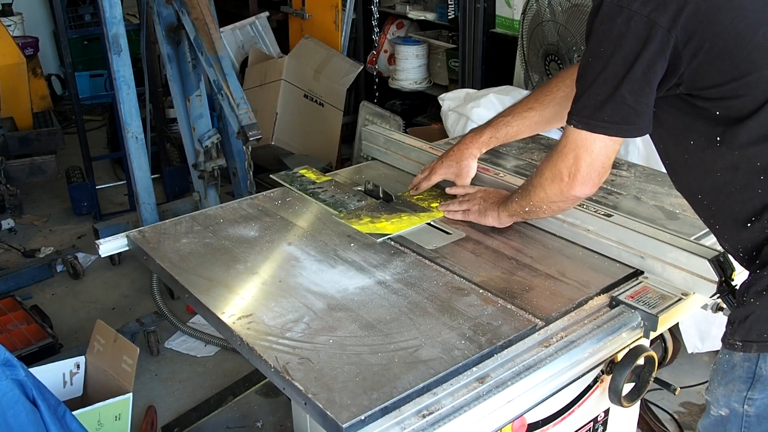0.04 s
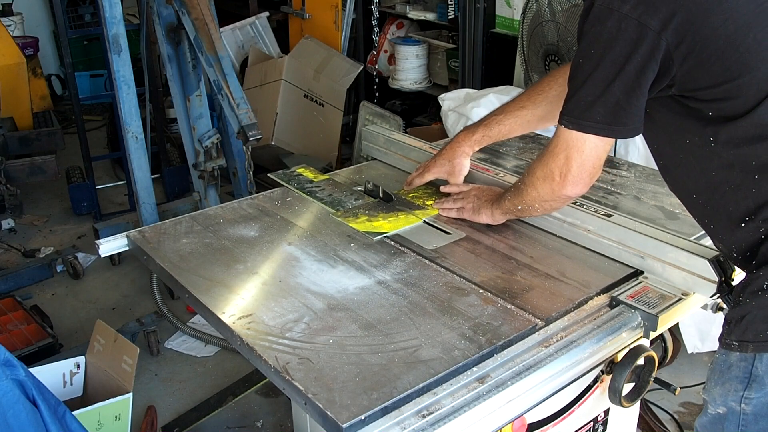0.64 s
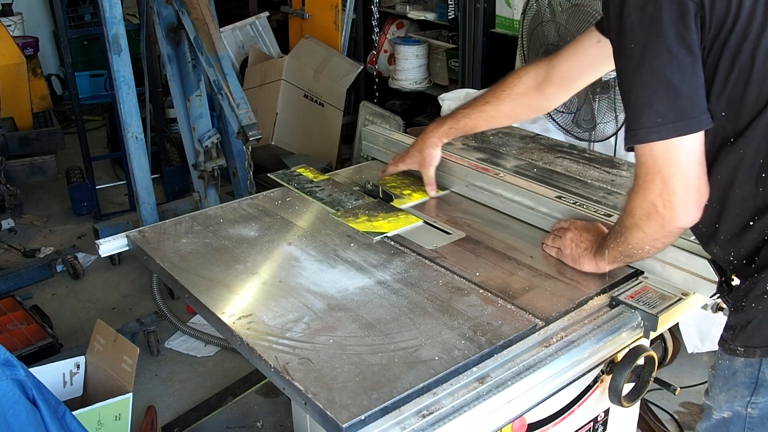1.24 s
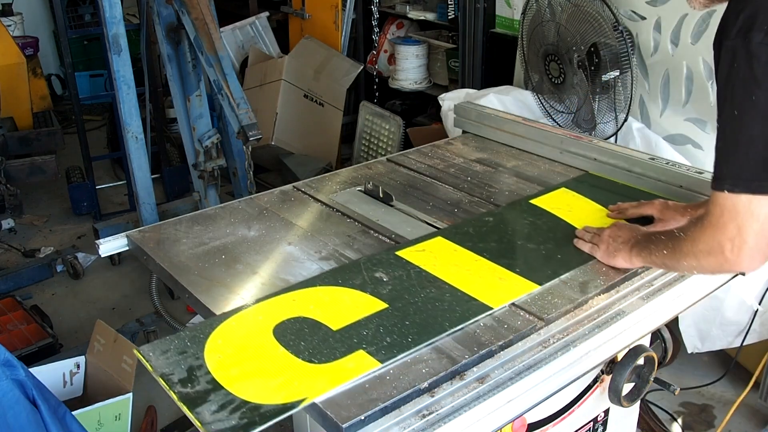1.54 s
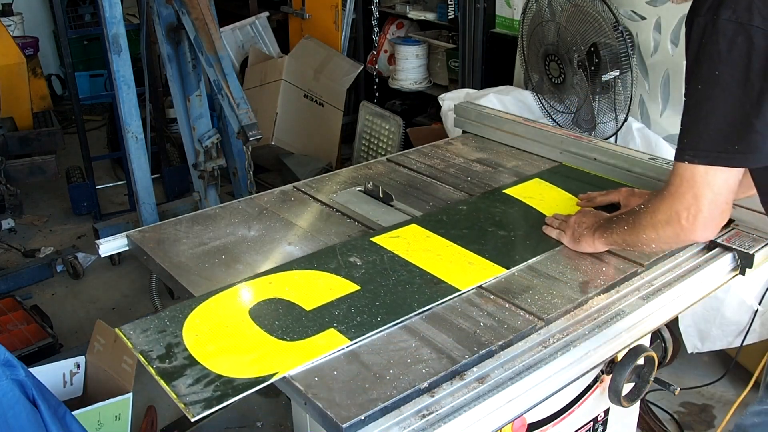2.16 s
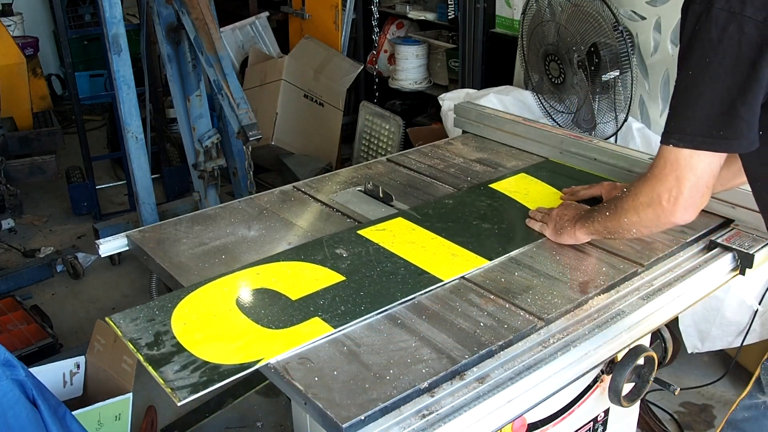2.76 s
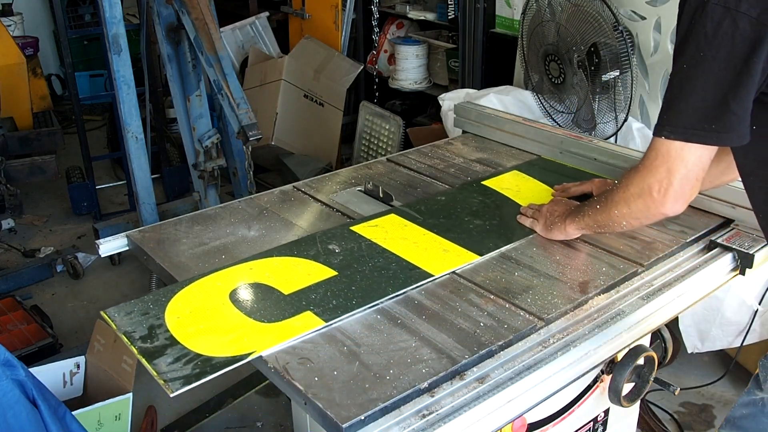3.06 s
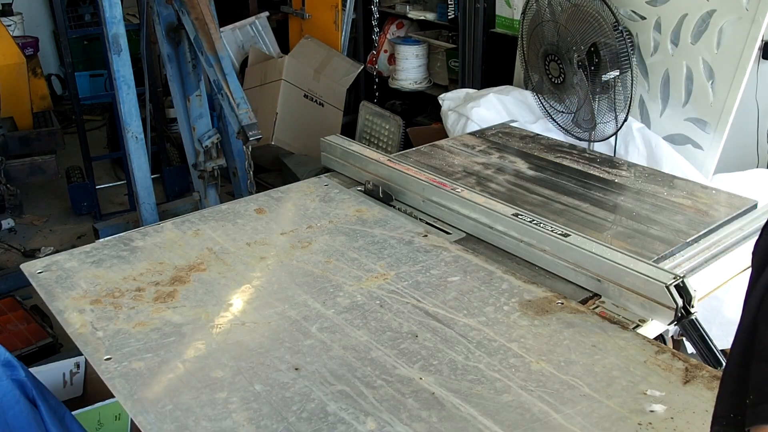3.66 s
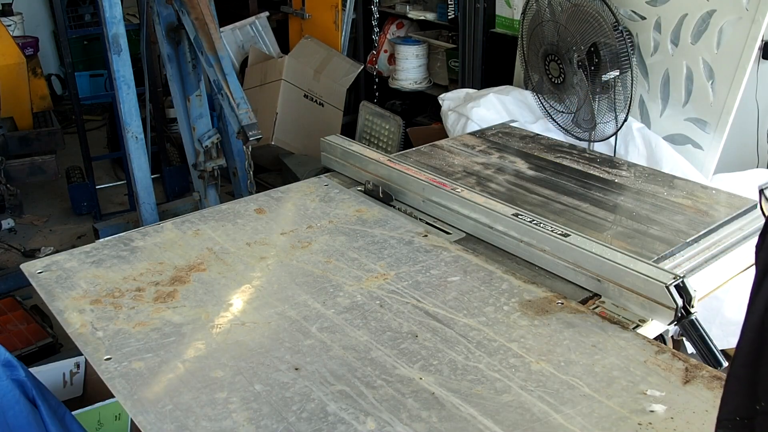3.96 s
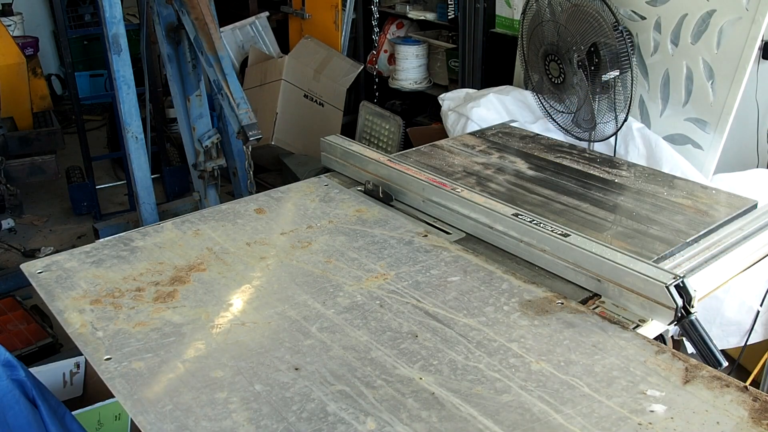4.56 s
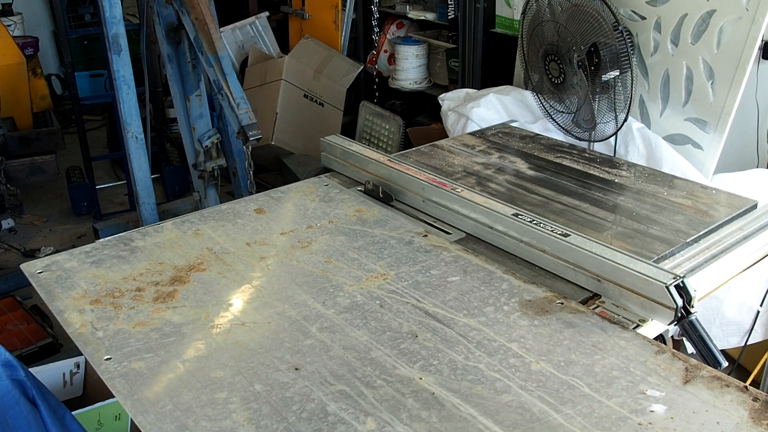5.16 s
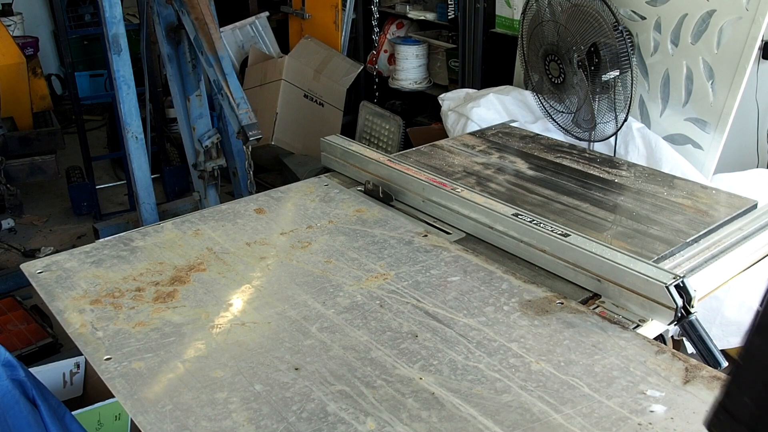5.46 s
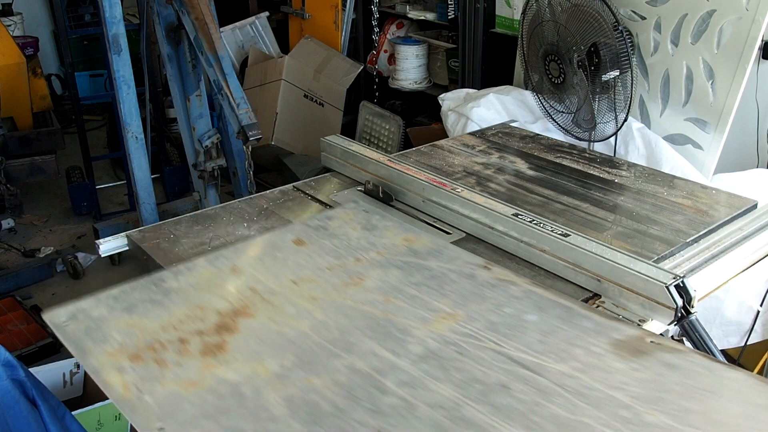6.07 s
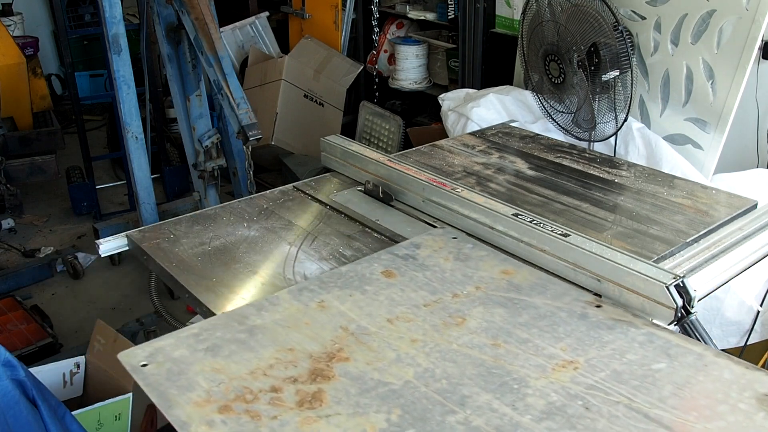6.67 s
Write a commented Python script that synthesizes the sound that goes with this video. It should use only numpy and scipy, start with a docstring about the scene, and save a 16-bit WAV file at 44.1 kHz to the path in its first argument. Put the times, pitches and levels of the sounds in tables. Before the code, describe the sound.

A table saw scrapes and squeals through metal sheet twice, cuts to quiet, then is switched on and spins up to a whistling drone.

```python
"""A table saw scrapes and squeals through a small metal sheet. Three more short scenes follow: it runs
free, it rips a long sheet, then it stands still, is switched on and spins up.
In the cuts the teeth tear chips, and blade and sheet ring; the blade sticks and slips in the kerf.
The motor hums, its fan drones, the teeth whistle and stir the air.
At the start the winding growls and belt and cabinet rattle."""
import sys
import numpy as np
from scipy import signal
from scipy.fft import rfft, irfft, next_fast_len
from scipy.io import wavfile
from scipy.ndimage import map_coordinates

SR = 44100
rng = np.random.default_rng(int(sys.argv[2]) if len(sys.argv) > 2 else 0)


def unload_audio(sound):
    """Save the sound as a 16-bit wav file, at the path given as the first command line argument."""
    columns = np.transpose(np.atleast_2d(sound))
    # keep every value between -1 and 1, then stretch to whole-number steps
    steps = np.round(np.clip(columns, -1, 1) * 32767)
    wavfile.write(sys.argv[1], SR, steps.astype(np.int16))


N = 300321
SIZE = next_fast_len(N, real=True)
TIME, BINS = np.arange(N) / SR, np.fft.rfftfreq(SIZE, 1 / SR)

MAINS_HZ = 50
# running scenes end; power on; blade starts to turn; starting winding cuts out
STOP_S, SWITCH_ON_S, TURN_S, CUTOUT_S = 3.37, 4.212, 4.428, 5.24

# One table a cut, small sheet then long. Each row: time in s, blade ring in dB, chip spray in dB.
CUT_ENVELOPES = [
    [(0.0, -27.5, -27), (.4, -27.5, -30.5), (.51, -27, -27.5), (.58, -31, -33), (.79, -30.5, -37.5),
     (.89, -30, -34.5), (1.32, -25.5, -32.5), (1.36, -32.5, -35), (1.42, -36, -46)],
    [(1.975, -31, -31.5), (2.14, -30.5, -34.5), (2.45, -26.5, -26.5), (2.78, -28.5, -29.5),
     (3.0, -26.5, -25.5), (3.1, -24.5, -29.5), (3.2, -29.5, -30), (3.27, -25.5, -30), (3.378, -31, -34.5)],
]
# Likeness of left and right. Each row: frequency in Hz, correlation.
STEREO_CORRELATION = [(100, 1), (400, 0.99), (1000, 0.83), (2000, 0.64), (3000, 0.36), (5500, 0.22),
                      (9000, 0.04), (15000, 0.046)]


def amp(db):
    """dB to gain."""
    return 10 ** (np.asarray(db) / 20)


def unit(x):
    """Scale to rms 1."""
    return x / np.sqrt(np.mean(x ** 2) + 1e-20)


def curves(rows):
    """Table columns as curves over time."""
    times_s, *columns = np.transpose(rows)
    return [np.interp(TIME, times_s, column) for column in columns]


def level(rows):
    """Rows of (s, dB) as a gain curve."""
    return amp(curves(rows)[0])


def gate(start_s, rise_s, end_s=np.inf, fall_s=1):
    """Linear rise from start_s, hold, linear fall from end_s."""
    return np.clip((TIME - start_s) / rise_s, 0, 1) * np.clip(1 - (TIME - end_s) / fall_s, 0, 1)


def since(start_s):
    """Seconds since start_s, zero before."""
    return np.maximum(TIME - start_s, 0)


def wander(rate_hz):
    """Smooth random curve, rms 1."""
    knots = rng.standard_normal(size=4096)
    coarse_s = TIME[::32]
    smooth = map_coordinates(knots, [coarse_s * rate_hz * 2], order=2, mode="wrap")
    return np.interp(TIME, coarse_s, unit(smooth))


def spectrum(points):
    """Rows of (Hz, value) joined over log frequency."""
    hz, value = np.transpose(points)
    return np.interp(np.log(BINS + 1), np.log(hz + 1), value)


def shaped(x, response):
    """Filter by a frequency response."""
    return irfft(rfft(x, SIZE) * response, SIZE)[:, :N]


def mode(hz, width_hz):
    """Frequency response of one resonance."""
    return 1 / (1 + 2j * (BINS - hz) / width_hz)


def reflections(wet_db, t60_s):
    """Direct path plus echoes off table and walls, which ripple the upper spectrum."""
    echoes = rng.standard_normal(N) * np.exp(-np.log(1000) * np.minimum(TIME / t60_s, 10))
    echoes *= TIME > .004
    return 1 + amp(wet_db) * rfft(echoes / np.linalg.norm(echoes), SIZE) * BINS / (BINS + 400)


def noise(response):
    """Coloured stereo noise, rms 1, less correlated toward the treble."""
    a, b = rng.standard_normal((2, len(BINS))) + 1j * rng.standard_normal((2, len(BINS)))
    correlation = np.clip(spectrum(STEREO_CORRELATION), -1, 1)
    mid, side = a * np.sqrt(1 + correlation), b * np.sqrt(1 - correlation)
    return unit(irfft(np.array([mid + side, mid - side]) * response, SIZE)[:, :N])


def band(length_s, hz, width_hz):
    """Short stereo noise in a Gaussian band, rms 1."""
    size = round(length_s * SR)
    a, b = rng.standard_normal((2, 2 * SR))[:, :size]
    correlation = np.clip(np.interp(hz, BINS, spectrum(STEREO_CORRELATION)), -1, 1)
    mid, side = a * np.sqrt(1 + correlation), b * np.sqrt(1 - correlation)
    colour = np.exp(-.5 * ((np.fft.rfftfreq(size, 1 / SR) - hz) / width_hz) ** 2)
    return unit(irfft(rfft([mid + side, mid - side]) * colour, size))


def phase(hz):
    """Running angle in rad of a frequency curve."""
    return 2 * np.pi * np.cumsum(hz * np.ones(N)) / SR


def tone(angle, flutter, rate_hz, spread_rad):
    """Sine of rms 1; it flutters in moving air and reaches the two microphones out of step."""
    size = 1 + flutter * wander(rate_hz)
    start_rad = 2 * np.pi * rng.random()
    offsets_rad = np.array([spread_rad * (side + flutter * wander(rate_hz)) for side in (.5, -.5)])
    return unit(size * np.cos(start_rad + angle + offsets_rad))


def add(mix, start_s, sound):
    """Mix a sound in at start_s."""
    part = mix[:, round(start_s * SR):][:, :sound.shape[1]]
    part += sound[:, :part.shape[1]]


def cut(sheet):
    """Teeth tear chips in uneven bites; the scrape rings the blade and drums on sheet 0 or 1."""
    # Each row: frequency in Hz, scrape density in dB.
    scrape_colour = [(100, -35), (300, -21.5), (700, -14.5), (1100, -5), (2000, -9), (2500, -0.5),
                     (3400, 5), (4400, 3), (5500, -2), (6900, 1), (9000, -1.5), (12000, -4.5), (15500, -11)]
    # Each row: frequency in Hz, width in Hz, dB over the scrape on the small sheet, on the long sheet.
    blade_modes = [(1141, 20, 9, 5), (1529, 16, -6, 9), (1831, 14, 6, 0), (1990, 16, 3, 0),
                   (2449, 18, 3, -4), (2606, 16, 4, -4), (2643, 22, 6, 2), (2993, 20, 0, -10),
                   (3110, 22, 0, -5), (3335, 26, 6, 4), (3566, 26, 2, 6), (4152, 20, 10, 6),
                   (4229, 11, 7, 14), (4514, 22, 5, -5), (4750, 18, 2, 3), (4942, 16, 4, -6),
                   (5145, 26, 6, 4), (5770, 40, -2, -6), (5943, 40, -8, 1), (6185, 20, 1, 3),
                   (7010, 60, -1, -2), (8040, 60, -2, -1), (8330, 24, -2, 3), (8920, 30, 2, -6),
                   (9286, 24, -3, 1), (9580, 36, 3, -3), (9959, 24, -2, 2), (10660, 36, -1, -1),
                   (10960, 36, -4, 0), (11876, 60, -12, 0)]
    # Each row, one a sheet: offsets in dB for drumming, ring and spray.
    offsets_db = [(-8.5, -1, 1.2), (-10.5, -0.15, 1.5)]
    chips_per_s, chip_decay_s, crossovers_hz = 260, 0.00066, (2100, 5300)
    envelope = CUT_ENVELOPES[sheet]
    start_s, end_s = envelope[0][0], envelope[-1][0]
    contact = np.interp(TIME, [start_s - .004, start_s, end_s - .01, end_s + 0.0081], [0, 1, 1, 0])
    impulses = (rng.random(N) < chips_per_s / SR) * np.minimum(rng.exponential(1, N), 4)
    chips = signal.lfilter([1], [1, -np.exp(-1 / (chip_decay_s * SR))], impulses)
    bites = amp(0.52 * wander(40)) * (1 + 0.29 * chips)
    scrape = noise(1) * bites
    ring = 1 + sum(amp(db[sheet]) * mode(hz, width_hz) for hz, width_hz, *db in blade_modes)
    body = amp(spectrum(scrape_colour)) * ring * reflections(wet_db=-2.5, t60_s=0.11)
    above_sheet, above_blade = (1 / (1 + (hz / (BINS + 1)) ** 12) for hz in crossovers_hz)
    ring_db, spray_db = curves(envelope)
    # drumming low, ring in the middle, spray on top
    bands = [(1 - above_sheet, ring_db), (above_sheet - above_blade, ring_db), (above_blade, spray_db)]
    return contact * sum(amp(db + offset_db) * unit(shaped(scrape, body * share))
                         for (share, db), offset_db in zip(bands, offsets_db[sheet]))


def squeal():
    """One blade mode sticks and slips in the kerf: a rough, stuttering stack of partials."""
    # Each row: start in s, end in s, pitch in Hz, pitch sag in Hz, level in dB, fade in dB.
    spells = [(0, 0.507, 2398, 2, -39, -2), (.56, 1.36, 2380, -1, -46, -5),
              (1.977, 2.011, 2405, 20, -24.5, 5), (2.013, 2.403, 2405, 50, -35, 9),
              (2.408, 2.916, 2364, 0, -41.5, 0.5), (3.046, 3.171, 2403, 21, -39, 2),
              (3.299, 3.364, 2375, 1.5, -39, -2)]
    # Each row: harmonic number, dB on the small sheet, dB on the long sheet.
    partials = [(1, 2, 1.5), (2, -22, 0), (3, -12, -2.5), (4, -10, -4.5), (5, -7, -7), (6, -17, -8)]
    rise_s, fall_s = 0.0041, .015
    hz, envelope = np.zeros(N), np.zeros(N)
    for start_s, end_s, pitch_hz, sag_hz, db, fade_db in spells:
        progress = np.clip((TIME - start_s) / max(end_s - start_s, .01), 0, 1)
        hz = np.where(TIME >= start_s, pitch_hz - sag_hz * progress, hz)
        spell = amp(db - fade_db * progress) * gate(start_s, rise_s, end_s, fall_s)
        envelope = np.maximum(envelope, spell)
    long_sheet = TIME > CUT_ENVELOPES[0][-1][0] + .2
    slip_hz = np.where(long_sheet, 23, 6) * wander(130)
    angle = phase(hz + slip_hz)
    stack = sum(amp(np.where(long_sheet, long_db, small_db))
                * tone(round(k) * angle, flutter=0.33, rate_hz=45, spread_rad=0.63)
                for k, small_db, long_db in partials)
    stutter_db = np.where(long_sheet, 2.8, 1.4) * wander(45)
    return envelope * amp(stutter_db) * stack


def singing():
    """Single resonances of sheet, blade or cabinet swell and fade; friction holds them fairly steady."""
    # Each row: start in s, end in s, frequency in Hz, width in Hz, level in dB.
    spells = [(.42, .66, 1831, 14, -39.5), (.8, 1.12, 1831, 14, -40), (0, 1.35, 4155, 14, -42),
              (2.0, 2.44, 4768, 10, -33), (2.22, 2.46, 9290, 22, -43), (2.24, 2.46, 8330, 18, -44),
              (2.25, 3.2, 3568, 12, -35.5), (2.1, 2.9, 2635, 25, -41), (2.92, 3.1, 4746, 10, -30.5),
              (3.13, 3.38, 7060, 30, -39), (3.04, 3.17, 1400, 40, -38.5), (2.89, 3, 1529, 20, -43),
              (3.21, 3.33, 1835, 25, -42.5), (3.94, 4.15, 4220, 170, -64), (4.47, 4.53, 4480, 130, -47),
              (4.48, 4.56, 2620, 100, -44), (4.77, 4.96, 1700, 60, -40), (4.93, 5.3, 660, 90, -38)]
    out = np.zeros((2, N))
    for start_s, end_s, hz, width_hz, db in spells:
        swing = signal.hilbert(band(max(end_s - start_s, .02), hz, width_hz))
        steady = unit(swing.real / (abs(swing) + .5))
        add(out, start_s, amp(db) * steady * signal.windows.tukey(steady.shape[1], .8))
    return out


def running_gain(part):
    """Gain at which one part of the running saw is heard until STOP_S."""
    # How loud drone, whistle and rush come through; the recorder's gain ducks them during the cuts.
    # Each row: time in s, heard level in dB.
    heard_db = [(0, -8.5), (.45, -10), (.95, -5.5), (1.51, -6), (1.53, 0.5), (1.975, 0), (1.995, -11.5),
                (3.37, -18.5)]
    # Each entry: level running free in dB, dB per dB of heard level.
    parts = {"drone": (-29, 1.15), "octave": (-36, 1.25), "whistle": (-40.5, 1.9), "rush": (-27.5, 1),
             "howl": (-27.5, 1.33)}
    free_db, slope = parts[part]
    return amp(free_db + slope * curves(heard_db)[0]) * gate(-0.89, 1, STOP_S, .012)


def spin_up():
    """Blade speed from 0 to 1 after TURN_S: a quick pull plus a slow one."""
    quick_share, quick_s, slow_s = .54, .102, .408
    quick = quick_share * np.exp(-since(TURN_S) / quick_s)
    slow = (1 - quick_share) * np.exp(-since(TURN_S) / slow_s)
    return np.clip(1 - quick - slow, 0, 1)


def sweep_gain(hz, peaks):
    """Gain of a tone rising through resonances in the spin-up."""
    power = sum(amp(db) ** 2 / (1 + (1.1 * (hz - centre_hz) / width_hz) ** 2) ** 2
                for centre_hz, width_hz, db in peaks)
    return np.sqrt(power) * gate(TURN_S, 0.054)


def tooth_rate():
    """Tooth-pass rate in Hz: nearly steady while running, from zero in the spin-up."""
    # Each row: time in s, rate in Hz.
    running_hz = [(0, 6374), (1.1, 6387), (1.51, 6385), (1.53, 6415), (1.97, 6413), (2.5, 6385),
                  (3.38, 6362)]
    top_hz = 6364
    return np.where(TIME < SWITCH_ON_S, curves(running_hz)[0], top_hz * spin_up())


def fan_drone(teeth_hz):
    """Fan tone, its octave and weak shaft overtones, locked to the shaft speed."""
    # Each row: multiple of the fan tone, level in dB re the octave.
    overtones = [(1.375, -13), (1.621, -16), (1.817, -21.5), (3, -13), (3.999, -30)]
    # Resonances swept in the spin-up. Each row: frequency in Hz, width in Hz, peak in dB.
    drone_peaks = [(333, 240, -45.5), (430, 5.5, -23), (494, 5.5, -29.5), (520.5, 11.5, -28)]
    octave_peaks = [(983, 55, -36.5), (1022, 5.8, -33.5), (1050, 5.6, -33.5), (1059, 6.4, -33)]
    teeth_per_cycle = 12
    fan_hz = teeth_hz / teeth_per_cycle
    angle = phase(fan_hz)
    left_db = np.where(TIME < SWITCH_ON_S, -1.8, .4)  # standing wave shifts with what lies on the table
    drone = tone(angle, flutter=0.0096, rate_hz=32, spread_rad=.5) * amp([left_db, -left_db])
    upper = tone(2 * angle, flutter=0.12, rate_hz=15, spread_rad=0.12)
    for multiple, db in overtones:
        upper += amp(db) * tone(multiple * angle, flutter=0.15, rate_hz=10, spread_rad=0.39)
    return (drone * (running_gain("drone") + sweep_gain(fan_hz, drone_peaks))
            + upper * (running_gain("octave") + sweep_gain(2 * fan_hz, octave_peaks)))


def tooth_whistle(teeth_hz):
    """Passing teeth whistle; the blade shudders until it is up to speed."""
    # Resonances swept in the spin-up. Each row: frequency in Hz, width in Hz, peak in dB.
    peaks = [(2740, 310, -34.5), (4400, 290, -31.5), (5640, 680, -40.5), (6254, 62, -36.5),
             (6343, 3.7, -32.5)]
    rest_flutter_db = 4.5
    angle, speed = phase(teeth_hz), teeth_hz / teeth_hz.max()
    shudder_rad = (.2 + 3.6 * (1 - speed)) * wander(130)
    whistle = tone(angle + shudder_rad, flutter=0.18, rate_hz=30, spread_rad=1.44)
    whistle += amp(-10) * speed * tone(2 * angle + shudder_rad, flutter=0.22, rate_hz=40, spread_rad=1.3)
    whistle *= amp(rest_flutter_db * (1 - speed) * wander(45))
    return whistle * (running_gain("whistle") + sweep_gain(teeth_hz, peaks))


def air_rush(walls):
    """Turbulence round the blade grows with speed."""
    # Each row: frequency in Hz, density in dB.
    colour = [(40, -34), (130, -8.5), (280, -9), (420, 0), (600, -4.5), (1000, -0.5), (1700, 2.5),
              (2050, -2), (3000, 4.5), (4450, 0), (5000, -7), (5900, -9.5), (6600, -4.5), (9500, -6),
              (15500, -14.5)]
    top_db, rest_drop_db = -28, 25.5
    starting = amp(top_db - rest_drop_db * (1 - spin_up()) ** 1.36) * gate(TURN_S - .01, 0.021)
    return (running_gain("rush") + starting) * noise(amp(spectrum(colour)) * walls) * amp(.5 * wander(50))


def gullet_howl(walls):
    """Near full speed the gullets howl and the cabinet booms; the howl slides up, overshoots, settles."""
    howl_hz, width_hz, slide_hz, boom_hz = 2890, 670, 750, 186
    full_s, rise_s, settle_s = 5.39, .22, 0.17
    settled_db, overshoot_db = -29, 4.5
    onset = gate(full_s - rise_s, rise_s)
    starting = onset * amp(settled_db + overshoot_db * np.exp(-since(full_s) / settle_s))
    flat_hz = slide_hz * (1 - onset) * (TIME > SWITCH_ON_S)
    hollow = signal.hilbert(noise(abs(mode(howl_hz, width_hz)) ** 3 * walls), SIZE)[:, :N]
    howl = (hollow * np.exp(1j * phase(25 * wander(60) - flat_hz))).real  # frequency shift
    boom = amp(-20.5) * tone(phase(boom_hz), flutter=0.47, rate_hz=10, spread_rad=0.11)
    return (running_gain("howl") + starting) * (amp(1.2 * wander(30)) * howl + boom)


def motor_hum():
    """Hum at twice the mains; it surges as the starting winding cuts out and sags just after."""
    # Each row: time in s, level in dB.
    running_db = [(0, -59), (.4, -56.5), (.8, -49), (1.5, -50.3), (1.55, -47), (1.975, -46.5), (2, -60),
                  (3.37, -69)]
    start_db, at_speed_db, swing_db = -46.5, -44, 6
    rise_s, sag_after_s, swing_s = 0.2, 0.2, 0.085
    surge, sag = (np.exp(-((TIME - s) / swing_s) ** 2) for s in (CUTOUT_S, CUTOUT_S + sag_after_s))
    hum_db = start_db + (at_speed_db - start_db) * gate(CUTOUT_S, sag_after_s) + swing_db * (surge - sag)
    envelope = level(running_db) * gate(-1, 1, STOP_S, .012) + amp(hum_db) * gate(SWITCH_ON_S, rise_s)
    return envelope * tone(phase(2 * MAINS_HZ), flutter=0.016, rate_hz=24, spread_rad=.01)


def workshop():
    """Quiet room noise, its level set scene by scene."""
    # Each row: frequency in Hz, density in dB.
    colour = [(25, -38), (35, -26), (66, -8), (95, -16.5), (200, -15.5), (450, -17.5), (600, -18.5),
              (1600, -15.5), (2300, -20.5), (3700, -21), (5200, -31), (7500, -30), (11000, -36.5),
              (15500, -38)]
    # Each row: time in s, gain in dB.
    scene_db = [(1.97, -4.5), (2, -11), (3.37, -19), (3.39, -1.5)]
    return amp(-55) * noise(amp(spectrum(colour))) * level(scene_db)


def knocks():
    """Teeth catch, the sheet knocks, the start jolts: noise bursts that rise fast and die away."""
    # Each row: start in s, level in dB, centre in Hz, width in Hz, 60 dB decay time in s.
    bursts = [(0.504, -32.5, 1970, 865, 0.22), (0.686, -22, 6800, 2300, 0.07), (1.321, -24, 8250, 350, .14),
              (1.325, -27, 7500, 4000, 0.065), (3.05, -36, 950, 232, 0.33), (4.21, -41, 560, 170, 0.065),
              (4.218, -48, 1200, 1000, 0.19), (4.22, -50, 6000, 4000, 0.17), (5.925, -33, 845, 180, 0.11)]
    rise_s = 0.0012
    out = np.zeros((2, N))
    for start_s, db, hz, width_hz, t60_s in bursts:
        burst = band(.5, hz, width_hz)
        age_s = TIME[:burst.shape[1]]
        add(out, start_s, amp(db - 60 * age_s / t60_s) * (1 - np.exp(-age_s / rise_s)) * burst)
    return out


def winding_growl():
    """The starting winding buzzes at mains harmonics in the resonant cabinet until it cuts out."""
    # Each row: multiple of the mains, level in dB.
    harmonics = [(4, -22), (6, -14.5), (8, -6.5), (10, -10.5), (12, -9), (14, -24)]
    # Each row: frequency in Hz, width in Hz, level in dB.
    cabinet_modes = [(298, 18, -17), (354, 50, -8), (431.2, 26, 3), (557, 28, -8), (648, 190, -13.5)]
    rise_s, fall_s = .025, 0.15
    mains = phase(MAINS_HZ)
    buzz = sum(amp(db) * tone(round(k) * mains, flutter=0.43, rate_hz=6.2, spread_rad=0.05)
               for k, db in harmonics)
    cabinet = noise(sum(amp(db) * mode(hz, width_hz) ** 2 for hz, width_hz, db in cabinet_modes))
    return amp(-38) * gate(SWITCH_ON_S, rise_s, CUTOUT_S - fall_s, fall_s) * (buzz + amp(-2) * cabinet)


def cabinet_rattle():
    """Belt and cabinet rattle at the jolt of the start, then with the pull on the belt."""
    # Each row: frequency in Hz, density in dB.
    colour = [(60, -31), (200, -3.5), (350, -6), (700, 0.5), (1200, -1.5), (1800, -2.5), (2200, -4.5),
              (3200, -10.5), (4500, -24), (6000, -26), (15000, -38)]
    jolt_db, decay_db_per_s = -41, 80
    speed = spin_up()
    jolt = amp(jolt_db - decay_db_per_s * since(SWITCH_ON_S)) * gate(SWITCH_ON_S, 0.016)
    pull = amp(-29.5) * (0.1 + speed) * (1 - speed) ** 0.4 * gate(TURN_S, 0.013)
    shake = amp(1.5 * wander(60))
    return (jolt + pull) * shake * noise(amp(spectrum(colour)) * reflections(wet_db=-4.5, t60_s=0.15))


def scene():
    """Two cuts, the workshop and the saw's own noise."""
    mix = cut(sheet=0) + cut(sheet=1) + workshop()
    mix += motor_hum() + winding_growl() + cabinet_rattle()
    teeth_hz = tooth_rate()
    mix += fan_drone(teeth_hz) + tooth_whistle(teeth_hz)
    walls = reflections(wet_db=-5.5, t60_s=0.1)
    mix += air_rush(walls) + gullet_howl(walls)
    return mix + squeal() + singing() + knocks()


def record(dry):
    """Microphone pair, the left a little brighter, then a steep low-pass."""
    left_treble_db, cutoff_hz = 1.0, 15900
    tilt = amp(left_treble_db * np.array([[.5], [-.5]]) * BINS / (BINS + 4000))
    lowpass = signal.firwin(511, cutoff_hz, window=("kaiser", 9), fs=SR)
    return signal.oaconvolve(shaped(dry, tilt), lowpass[None], "same")


dry = scene()
out = record(dry)
unload_audio(out)
```